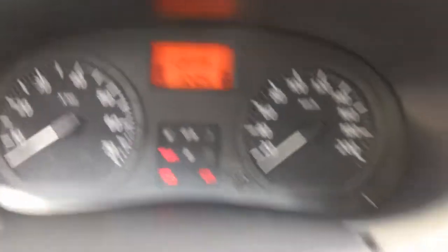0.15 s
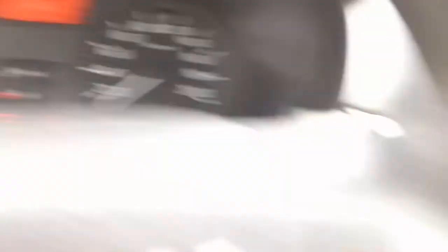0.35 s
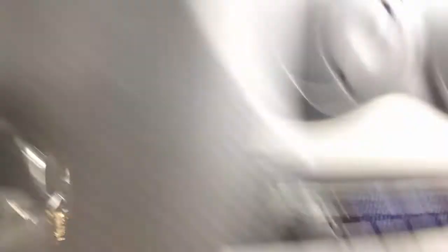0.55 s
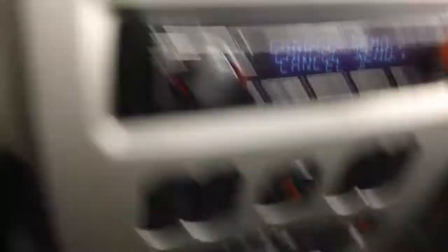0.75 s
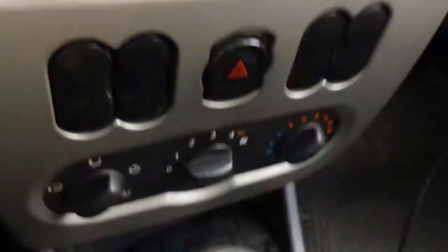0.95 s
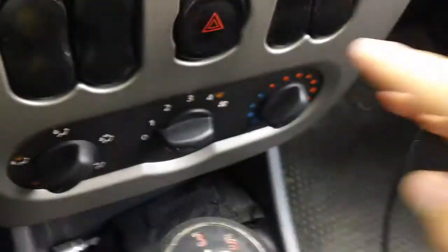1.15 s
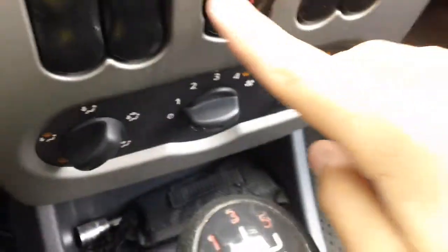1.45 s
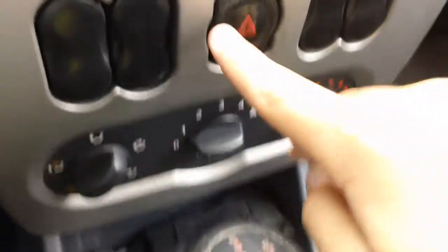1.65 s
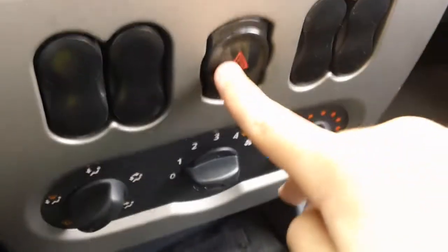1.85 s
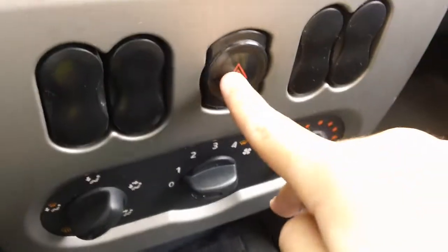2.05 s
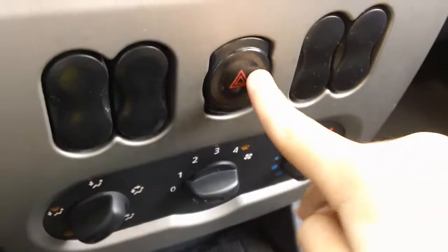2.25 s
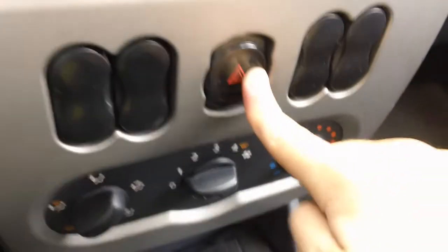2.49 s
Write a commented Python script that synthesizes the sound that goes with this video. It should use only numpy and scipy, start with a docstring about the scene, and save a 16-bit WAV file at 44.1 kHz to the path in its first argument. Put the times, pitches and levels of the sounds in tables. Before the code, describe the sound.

A dashboard hazard button snaps with a bright, brittle plastic click near the end. Before it, constant even hiss in a parked car, with one dry tick and tiny finger scratches on the handheld recorder.

```python
"""Inside a parked car, engine off: from start to end an even, broadband hiss of shaped noise, almost all
in the centre, most likely the hand-held recorder's own. At half a second, as the recorder swings round,
its case ticks (brief decaying sines) and fingers rub on it (swells of bright noise). Near the end a
plastic dashboard button snaps over and chatters: each contact is a noise crack and ringing sines, with
a short cabin tail. The recorder puts a deep notch in the treble."""
import sys
import numpy as np
from scipy import signal
from scipy.fft import rfft, irfft
from scipy.io import wavfile

SR = 44100
rng = np.random.default_rng(int(sys.argv[2]) if len(sys.argv) > 2 else 0)


def to_wav(s):
    """Save 16-bit WAV."""
    ch = np.atleast_2d(s).T  # columns
    pcm = np.round(np.clip(ch, -1, 1) * 32767)  # PCM
    wavfile.write(sys.argv[1], SR, pcm.astype(np.int16))


N = 115542  # length in samples
EDGE_HZ = 15400  # sharp upper edge of the treble


def undb(db):
    """Decibels to amplitude gain."""
    return 10 ** (np.asarray(db) / 20)


def noise(points, rms_db):
    """Random noise shaped by (freq_hz, level_db) points joined along log frequency, set to an rms level."""
    point_hz, point_db = np.array(points, float).T
    freq_hz = np.maximum(np.fft.rfftfreq(N, 1 / SR), 1)
    shape_db = np.interp(np.log(freq_hz), np.log(point_hz), point_db)
    shaped = irfft(rfft(rng.standard_normal(N)) * undb(shape_db), N)
    return shaped * undb(rms_db) / shaped.std()


def below_edge(sound):
    """The part of a sound under the sharp upper edge of the treble."""
    return irfft(rfft(sound) * (np.fft.rfftfreq(N, 1 / SR) < EDGE_HZ), N)


def ring(modes):
    """A struck object rings as decaying sines; neighbouring modes start in opposite directions."""
    t = np.arange(SR // 10) / SR
    total = np.zeros(len(t))
    for k, (freq_hz, level_db, t60_s) in enumerate(modes):
        decay = np.exp(-np.log(1000) * t / t60_s)  # down 60 dB after t60_s
        total += (-1) ** k * undb(level_db) * np.sin(2 * np.pi * freq_hz * t) * decay
    return total


def burst(decay_s):
    """A puff of noise dying exponentially, scaled to unit energy."""
    t = np.arange(SR // 10) / SR
    puff = rng.standard_normal(len(t)) * np.exp(-t / max(decay_s, 1 / SR))
    return puff / np.linalg.norm(puff)


def smear(sound, tail_db, decay_s):
    """Reflections: a sound followed by a dense, dying cloud of its own copies."""
    tail = signal.fftconvolve(sound, burst(decay_s))[:len(sound)]
    return sound + undb(tail_db) * tail


def add(out, start_s, sound):
    """Mix a sound in at a time."""
    i = int(round(start_s * SR))
    out[i:i + len(sound)] += sound[:N - i]


# spectrum of the steady hiss at the microphone: freq_hz, level_db (relative, per Hz)
HISS_SPECTRUM = [(22, -24), (45, -20.5), (65, -13.5), (95, -9), (135, -4.5), (260, -0.5), (600, 0.5),
                 (2000, -.5), (4500, -1.43), (8000, -2.5), (11500, -4.5), (15000, -6)]
# spectrum of the faint noise that differs between left and right: freq_hz, level_db (relative, per Hz)
WIDTH_SPECTRUM = [(22, -8), (60, -4), (170, 0.5), (600, -0.5), (1000, -13), (1600, -51), (4000, -70)]


def hiss():
    """Even noise in the centre, plus faint, mostly low noise of opposite sign left and right."""
    centre = below_edge(noise(HISS_SPECTRUM, -39.5))
    side = noise(WIDTH_SPECTRUM, -73)
    return centre + side * np.array([[1], [-1]])


# ring of the recorder's case, right at the microphone: freq_hz, level_db, t60_s
CASE_RING = [(4200, -23, .0015), (7300, -15, .002), (8800, -1.5, 0.0015), (10400, 0, 0.0016),
             (13900, -1, 0.002)]


def case_tick():
    """The handled case gives one dry, sharp tick: bright modes that die within milliseconds."""
    out = np.zeros(N)
    tick_s, tick_db = .4971, -11.5
    add(out, tick_s, undb(tick_db) * ring(CASE_RING))
    return out


# fingers slipping on the case: centre_s, level_db, spread_s
FINGER_SLIPS = [(.592, -44, 0.0027), (0.596, -25.5, .0007), (.6067, -39, .0006), (0.6275, -34, .0008),
                (.661, -44, .013)]
# spectrum of skin rubbing on the case: freq_hz, level_db (relative, per Hz)
RUB_SPECTRUM = [(1000, -15), (4000, -8), (9000, -1), (14000, 0)]


def finger_slips():
    """Friction noise swells in bell shapes: short scratchy slips, then a longer, soft rub."""
    t = np.arange(N) / SR
    swell = np.zeros(N)
    for centre_s, level_db, spread_s in FINGER_SLIPS:
        swell += undb(level_db) * np.exp(-.5 * ((t - centre_s) / spread_s) ** 2)
    return below_edge(noise(RUB_SPECTRUM, 0)) * swell


# contacts of the dashboard button, a faint first touch, the loud snap, then weaker rebounds:
# start_s, level_db
BUTTON_HITS = [(2.4174, -29), (2.4180, -13), (2.4186, -21), (2.4203, -30.5), (2.421, -26), (2.4230, -33),
               (2.4247, -36), (2.427, -34)]
# ring of the plastic button: freq_hz, level_db, t60_s
BUTTON_RING = [(3300, -18, .006), (4100, -19, .003), (4750, -20, .004), (5250, -15, 0.0045),
               (5730, -15, .004), (7030, -14, 0.0095), (7740, -9, .007), (9440, -2, 0.0068),
               (9900, -6, 0.0038), (11400, -3, .004), (13900, -7, .007), (14200, -13, .007),
               (15050, -15, .007)]


def button():
    """Each contact cracks and rings the plastic; the dashboard reflects it as a very short tail."""
    crack_db, crack_decay_s = -7, 0.00036
    cabin_db, cabin_t60_s = -8, .03
    out = np.zeros(N)
    body = ring(BUTTON_RING)
    for start_s, level_db in BUTTON_HITS:
        crack = undb(crack_db) * burst(crack_decay_s)
        add(out, start_s, undb(level_db) * (body + crack))
    return smear(out, cabin_db, cabin_t60_s / np.log(1000))


def scene():
    """The broadband hiss, almost all in the centre, with handling and button in the centre too."""
    return hiss() + case_tick() + finger_slips() + button()


def record(dry):
    """The recorder notches the treble, lowers everything above its sharp edge and cuts the top."""
    notch_hz, notch_width_hz = 12440, 3770
    above_edge_db, top_hz = -20, 16500
    notched = signal.lfilter(*signal.iirnotch(notch_hz, notch_hz / notch_width_hz, fs=SR), dry)
    kept = below_edge(notched)
    shelved = kept + undb(above_edge_db) * (notched - kept)
    top_cut = signal.ellip(10, .1, 80, top_hz, fs=SR, output="sos")  # steep low-pass
    return signal.sosfilt(top_cut, shelved)


dry = scene()
out = record(dry)
to_wav(out)
```